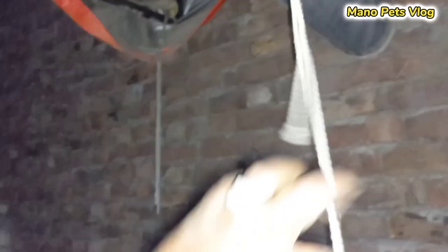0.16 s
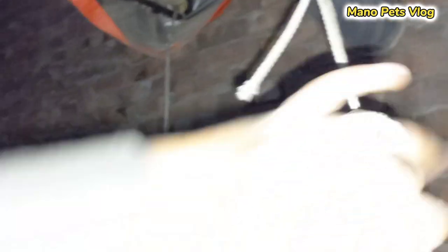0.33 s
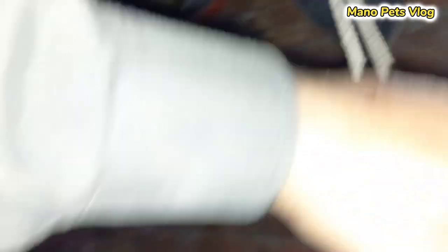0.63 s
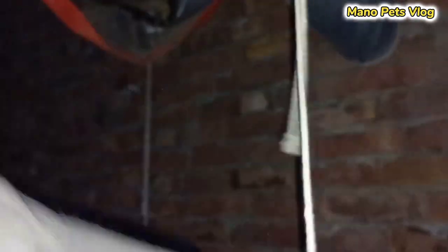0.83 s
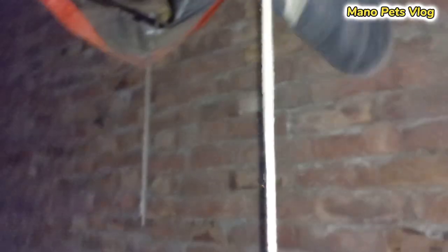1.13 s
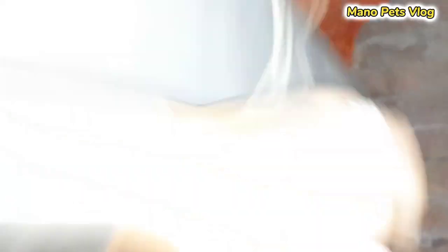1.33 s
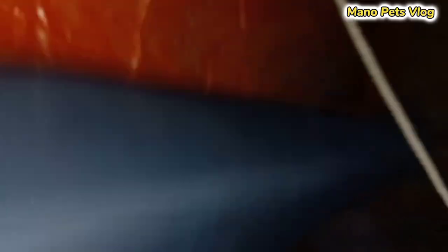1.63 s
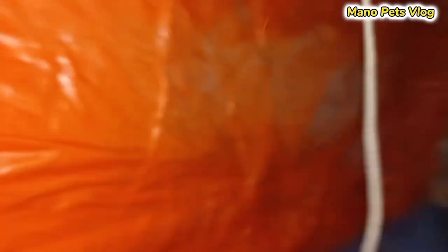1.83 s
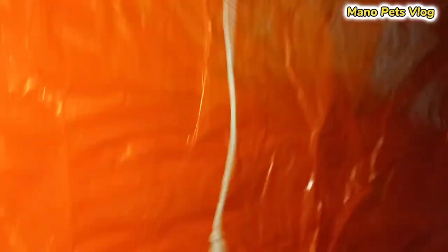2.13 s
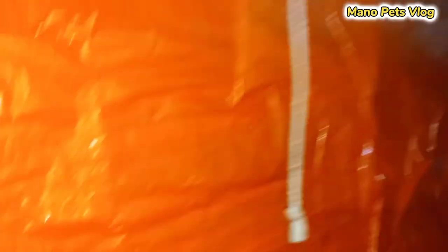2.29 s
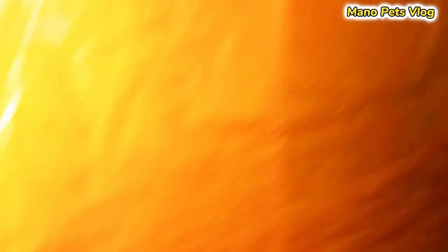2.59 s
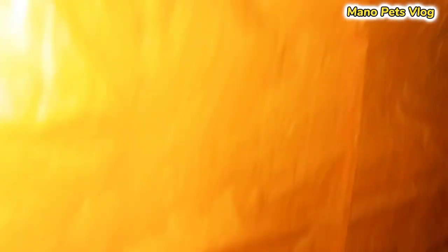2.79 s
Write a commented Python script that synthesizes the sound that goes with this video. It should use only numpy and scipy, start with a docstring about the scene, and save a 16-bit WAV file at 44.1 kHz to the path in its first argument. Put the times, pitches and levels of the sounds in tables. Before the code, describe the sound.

A plastic sheet curtain, very close: soft raspy rope tugs first, then a sharp slap as it drops, a loud rustling slide, hard knocks on the left, and uneven crinkling in a small brick shed.

```python
"""Brick farm shed: a plastic sheet curtain is untied and let down close to the microphones.
Rope tugs are dense clicks filtered to a rasp and a hollow rub. The sheet drops with a slap (crack and modes),
slides past (filtered noise) and knocks on the left microphone (damped rings), then unfolds with zips
(rough rising tones) and crinkles as it settles (clicks in three bands). Low thumps and hollow hums (wandering
sines), low buffeting, faint hiss and short wall echoes surround it."""
import sys
import numpy as np
from scipy import signal
from scipy.fft import rfft, irfft, next_fast_len
from scipy.io import wavfile

SR = 44100
rng = np.random.default_rng(int(sys.argv[2]) if len(sys.argv) > 2 else 0)


def store_pcm(level_fs):
    """Save levels as 16-bit WAV."""
    pcm = np.round(np.clip(level_fs, -1, 1) * 32767).astype(np.int16)
    wavfile.write(sys.argv[1], SR, np.atleast_2d(pcm).T)


N = 130095
T = np.arange(N) / SR

# Spectra list f/Hz, level/dB; only their shape counts. L-R/dB is left over right.
# air pushed onto the microphones: t/s, level/dB before trim
DRAUGHT = [(0, -31.5), (.22, -47.5), (.45, -42.5), (.65, -46.5), (.76, -35.5), (.85, -52), (1.048, -42),
           (1.056, -21.5), (1.115, -21.5), (1.135, -28), (1.3, -35.5), (1.38, -23), (1.5, -28), (1.55, -48),
           (1.75, -41), (1.9, -26.5), (2.12, -46), (2.39, -35), (2.47, -37), (2.57, -31), (2.7, -41.5),
           (2.76, -46.5), (2.95, -51)]
# spectrum of the buffeting: f/Hz, level/dB
DRAUGHT_SPECTRUM = [(22, -40), (45, -14), (85, -6), (120, -9), (170, -18), (260, -28.5)]
DRAUGHT_TRIM_DB = -1.5
# balance of buffeting and hollow body: t/s, L-R/dB
LOW_PAN = [(0, -0.5), (1.3, 0.5), (1.42, 7), (1.5, 10), (1.58, 15), (1.7, 4.5), (2.1, 1), (2.6, 1),
           (2.95, 1.5)]
# spectrum of the shed's hiss: f/Hz, level/dB
FLOOR_SPECTRUM = [(59, -55), (100, -29), (300, -15), (497, -12), (825, -37), (1760, -11.5), (3690, -18),
                  (6000, -19), (15500, -40.5)]
FLOOR_DB, FLOOR_PAN_DB = -44, -7

# rope tugs: t/s, rasp rise/ms, rasp decay/ms, rasp level/dB, hollow rub level/dB (before trims)
TUGS = [(-.01, 33, 67, -34.5, -39.5), (0.166, 2.6, 16, -32, -53), (.192, 3.5, 21, -36, -40),
        (0.256, 5.4, 36, -25, -32.5), (.266, 15.6, 44, -23, -30), (0.342, 5.8, 39, -27.5, -27),
        (0.353, 30.5, 28, -26.5, -27.5), (.435, 1.9, 69, -26.5, -30), (0.545, 16.4, 68, -30.5, -30),
        (.595, 24, 14.3, -27.5, -31), (0.699, 35, 83, -40, -40.5), (.722, 19.6, 9, -46, -26.5),
        (0.803, 34, 45, -36.5, -65)]
# spectrum of the rope's rasp: f/Hz, level/dB
RASP_SPECTRUM = [(470, -28), (800, -12), (1250, -3), (1550, -0.5), (1860, 1.5), (2730, 1), (3330, -2.5),
                 (4060, 1), (5400, -3.5), (7010, -5), (7840, -13.5), (15500, -16.5)]
# spectrum of the rope's hollow rub: f/Hz, level/dB
RUB_SPECTRUM = [(76, -83), (130, -35), (235, -10.5), (327, -10.5), (419, -6.5), (822, -20), (1000, -18),
                (1300, -22), (2200, -120)]
RASP_TRIM_DB, RASP_PAN_DB, RUB_TRIM_DB, RUB_PAN_DB = 2.5, -6.5, -1, 0.2
SHED_T60_S, ROPE_WET_DB, SHEET_WET_DB = 0.15, -14, -23.5  # T60 at low f

# low thumps and hollow housing hums: t/s, rise/ms, decay/ms, nominal f/Hz, level/dB, L-R/dB
HUMS = [(.004, 14, 15, 130, -26.5, -2.5), (.005, 4.8, 17.5, 267, -31.5, 1), (.492, 8.3, 16, 565, -30, 3),
        (0.717, 16, 10, 190, -22.5, 1), (1.052, 8, 13, 86, -12, 1), (1.098, 14, 8.5, 94, -12.5, 1.5),
        (1.099, 2.7, 11.7, 237, -18.5, 1), (1.326, 9.5, 17, 443, -19, 12), (1.469, 15.4, 7.6, 110, -12, 23),
        (1.471, 3.7, 15, 282, -16.5, 21), (1.89, 26, 12, 258, -28.5, 0), (2.345, 12, 14, 518, -27.5, 7),
        (2.534, 15, 18, 491, -27, 2.5), (2.542, 10, 22, 96.5, -24, 3), (2.72, 11.5, 10, 446, -27, 3.5),
        (2.806, 19, 28, 463, -24, 2), (2.832, 7.1, 10, 350, -23, -1), (2.826, 12, 21, 229, -30, -2),
        (2.908, 14, 25, 462, -31, .5)]
HUM_WANDER, HUM_WANDER_HZ = .05, 150  # rms of log pitch
# large folds collapse: t/s, rise/ms, decay/ms, level/dB, L-R/dB
FOLDS = [(0.271, 6.9, 31, -28.5, -8), (.365, 3.7, 35, -31, -11), (.44, 7, 73, -30, -5),
         (1.891, 2.6, 12, -17.5, -3), (1.906, 3.3, 11, -24, 8), (2.342, 10, 33, -32, -3),
         (2.538, 6, 16, -32, 0)]
# spectrum of a fold's dull crunch: f/Hz, level/dB
FOLD_SPECTRUM = [(130, -18), (260, 6.5), (520, 1.5), (900, -2), (1500, -8.5), (2800, 3), (3900, -6),
                 (5200, -32)]

# housing modes rung by the slap: f/Hz, level/dB, decay/ms
SLAP_MODES = [(572, -2, 2.1), (815, -22, 21), (1840, -17, 2), (3101, -38, 2.5), (4260, -18.5, 4),
              (5700, -19, 3), (7800, -16.5, 1.7)]
SLAP_S, SLAP_CRACK_DB, SLAP_CRACK_MS = 1.05, -12.5, 4
# spectrum of a slap's or knock's crack: f/Hz, level/dB
CRACK_SPECTRUM = [(150, 7.5), (900, 6), (2000, 8.5), (5000, -4), (9000, -7.5), (15000, -8)]

# falling sheet: t/s, crinkle/dB, top hiss/dB, hollow body/dB (before trims)
FALL = [(1.06, -32.5, -37.5, -25), (1.126, -37, -44.5, -36), (1.234, -29, -39.5, -27),
        (1.26, -33, -37.5, -34), (1.314, -22.5, -27.5, -24), (1.332, -20, -28.5, -19.5),
        (1.382, -27, -36.5, -27), (1.446, -27.5, -35.5, -30), (1.488, -21.5, -31, -19),
        (1.522, -63, -57, -44), (1.54, -53, -49, -80)]
# settling sheet: t/s, crinkle/dB, top hiss/dB, hollow body/dB (before trims)
SETTLE = [(1.55, -55, -54, -50), (1.6, -37, -44, -46.5), (1.642, -36.5, -43.5, -45.5),
          (1.686, -30, -34, -36.5), (1.81, -33, -39, -36), (1.862, -25.5, -36.5, -28.5),
          (1.886, -29.5, -38, -31.5), (1.908, -23.5, -33.5, -22), (1.935, -28.5, -36.5, -32),
          (1.986, -31, -42.5, -29), (2.028, -34, -37.5, -32), (2.05, -34, -46, -40),
          (2.085, -30.5, -44, -33.5), (2.14, -40, -46.5, -36), (2.18, -33, -45, -30.5),
          (2.266, -34.5, -46.5, -34), (2.356, -30.5, -37.5, -28), (2.458, -33, -41, -32),
          (2.492, -29, -37, -29), (2.708, -34.5, -46, -33.5), (2.746, -38.5, -46.5, -34.5),
          (2.8, -64, -57, -50), (2.812, -33.5, -59, -41), (2.84, -36, -50, -33.5), (2.902, -49, -66, -43.5),
          (2.918, -38, -54, -39), (2.95, -48, -62, -39)]
# spectrum of the crinkle: f/Hz, level/dB
CRINKLE_SPECTRUM = [(530, -30), (900, -11.5), (1600, -3), (1690, 1), (2280, 3.5), (3220, 0.5), (3520, 1.5),
                    (7000, -3), (7800, -15.5), (10100, -32), (17200, -120)]
# spectrum of the top hiss: f/Hz, level/dB
HISS_SPECTRUM = [(4290, -35), (7300, -2.5), (8380, -5.5), (11900, 0), (15100, -4.5), (15700, -5.5)]
# spectrum of the hollow body: f/Hz, level/dB
BODY_SPECTRUM = [(94, -14), (160, -0.5), (290, 2), (453, 3.5), (552, 3.5), (604, -0.5), (768, -0.5),
                 (1150, -6), (1500, -7), (2530, -120)]
CRINKLE_TRIM_DB, HISS_TRIM_DB, BODY_TRIM_DB = 1.38, 2, 0.4
CRINKLE_PAN_DB, HISS_PAN_DB = -4.5, -0.5
PATCH_RMS_DB, PATCH_HZ = 2.0, 20

# sheet scrapes past the housing, one event: t/s, rise/ms, decay/ms, level/dB
SLIDE = (1.3, 55, 106, -27)
# spectrum of its narrow, nasal rasp: f/Hz, level/dB
SLIDE_SPECTRUM = [(1650, -12), (2150, 3), (2650, -12)]
# single creases snap: t/s, level/dB before trim, L-R/dB
CREASES = [(1.334, -4.5, 14), (1.842, -9.5, 0), (1.864, -10.5, 18), (1.894, -8, -6), (1.905, -16, 16),
           (1.913, -13, 3), (2.015, -19, -6), (2.0243, -12.5, 3), (2.073, -19, 1), (2.234, -19, -1),
           (2.302, -19, -8), (2.3262, -11.5, -2.5), (2.347, -12, 3), (2.4735, -22, -10), (2.701, -18, -9)]
# spectrum of a snap: f/Hz, level/dB
CREASE_SPECTRUM = [(300, -19), (1200, -1), (2500, 5.5), (6800, 1), (8000, -4.5), (12000, -7), (16000, -5)]
CREASE_DECAY_MS, CREASE_TRIM_DB = 2.8, -5

# sheet strikes the left microphone: t/s, ring level/dB, L-R/dB, ring f/Hz, ring decay/ms, crack level/dB
KNOCKS = [(1.49, -10, 27, 1390, 1.9, -11), (1.5049, -9, 31, 1860, 0.55, -9.5),
          (1.5166, -2.5, 31, 1000, 0.61, -15.5)]
CRACK_DECAY_RATIO = 2  # to the ring's decay
# rising zips as the sheet moves near the microphones: t/s, length/s, from f/Hz, to f/Hz, level/dB
ZIPS = [(1.57, .052, 620, 1580, -41.5), (1.576, .036, 1650, 2250, -41), (1.668, .03, 2050, 2700, -30),
        (1.665, .062, 2900, 4950, -28.5), (1.706, .046, 4500, 5300, -36)]
ZIP_ROUGH, ZIP_OCTAVE_DB = .06, -14  # rms of relative f; second harmonic
CUTOFF_HZ = 15850


def from_db(db):
    """Decibels to gain."""
    return 10 ** (np.asarray(db) / 20)


def rms_one(x):
    """Scale to unit power."""
    return x / np.sqrt(np.mean(np.abs(x) ** 2) + 1e-20)


def in_time(rows):
    """Each column of a table as a curve in time."""
    s, *columns = np.transpose(rows)
    return [np.interp(T, s, c) for c in columns]


def pan(db):
    """Left and right gains with a mean of one."""
    gains = from_db(np.array([[1], [-1]]) * db / 2)
    return gains / gains.mean(0)


def colour(x, spectrum):
    """Minimum-phase filter of unit power gain, falling steeply beyond the ends of the spectrum."""
    size = next_fast_len(N + SR // 2, True) // 2 * 2
    octave = np.log2(np.fft.rfftfreq(size, 1 / SR) + 1)
    hz, db = np.transpose(spectrum)
    knots = np.log2(hz)
    octaves_outside = np.abs(octave - np.clip(octave, knots[0], knots[-1]))
    gain_db = np.interp(octave, knots, db) - np.minimum(60 * octaves_outside, 70)
    cepstrum = irfft(np.log(rms_one(from_db(gain_db))))
    # fold onto positive time: causal
    cepstrum[1:size // 2] *= 2
    cepstrum[size // 2 + 1:] = 0
    return irfft(rfft(x, size) * np.exp(rfft(cepstrum)))[..., :N]


def drift(rate_hz):
    """Noise through two equal low-pass poles at rate_hz, unit rms."""
    r = np.exp(-2 * np.pi * rate_hz / SR)
    noise = rng.standard_normal(N + SR)
    return rms_one(signal.lfilter([1], [1, -2 * r, r * r], noise)[SR:])


def swell(start_s, rise_ms, decay_ms):
    """Straight rise, then an exponential decay with the given time constant."""
    ms = (T - start_s) * 1000
    rise = np.clip(ms / abs(rise_ms), 0, 1)
    return rise * np.exp(-np.clip((ms - rise_ms) / abs(decay_ms), 0, 30))


def slips(per_s, spread_db, scatter_ms, lag_ms, clump_db):
    """Tiny buckles: random clicks of uneven size, each with its own delay from left to right."""
    size = from_db(spread_db * np.minimum(rng.exponential(1, N), 4))
    size = size * rng.choice([-1, 1], N)
    left = size * (rng.random(N) < per_s / SR) * from_db(clump_db * drift(48))
    delay = (lag_ms + scatter_ms * rng.standard_normal(N)) * SR / 1000  # samples
    right_at = (np.arange(N) + np.round(delay).astype(int)) % N
    return np.array([left, np.bincount(right_at, left, N)])


def voiced(clicks, spectrum, gain):
    """Clicks under a level curve ring through a spectrum; the curve sets the level of the middle."""
    return colour(clicks * gain, spectrum) / np.std(colour(clicks.mean(0), spectrum))


def air():
    """Low buffeting from the moving sheet, over the shed's faint hiss."""
    gusts = slips(per_s=2500, spread_db=1.2, scatter_ms=.7, lag_ms=.2, clump_db=1.5)
    level = from_db(in_time(DRAUGHT)[0] + DRAUGHT_TRIM_DB)
    draught = voiced(gusts, DRAUGHT_SPECTRUM, level) * pan(in_time(LOW_PAN)[0])
    floor = colour(rng.standard_normal((2, N)), FLOOR_SPECTRUM)
    return draught + from_db(FLOOR_DB) * pan(FLOOR_PAN_DB) * floor


def rope():
    """Each tug drags the rope over the plastic: a dense rasp on the right and a slower hollow rub."""
    rasp_power = sum((from_db(db) * swell(s, rise, decay)) ** 2 for s, rise, decay, db, _ in TUGS)
    rub_power = sum((from_db(db) * swell(s, rise + 6, decay * 1.56)) ** 2
                    for s, rise, decay, _, db in TUGS)
    rasp_slips = slips(per_s=8000, spread_db=2.0, scatter_ms=.35, lag_ms=-.12, clump_db=0.5)
    rub_slips = slips(per_s=3200, spread_db=1.0, scatter_ms=0.2, lag_ms=-0.028, clump_db=0.1)
    rasp = voiced(rasp_slips, RASP_SPECTRUM, np.sqrt(rasp_power))
    rub = voiced(rub_slips, RUB_SPECTRUM, np.sqrt(rub_power))
    return from_db(RASP_TRIM_DB) * pan(RASP_PAN_DB) * rasp + from_db(RUB_TRIM_DB) * pan(RUB_PAN_DB) * rub


def shed(x):
    """Brick walls: eight dull feedback delays a side."""
    size = next_fast_len(N + SR)
    hz = np.fft.rfftfreq(size, 1 / SR)
    walls = np.zeros((2, len(hz)), complex)
    for k, lag_s in enumerate(np.geomspace(.007, .043, 16)):
        loss = from_db(-60 * lag_s / SHED_T60_S) / (1 + (hz / 14000) ** 2)
        echo = loss * np.exp(-2j * np.pi * hz * lag_s)
        walls[k % 2] += (-1) ** (k // 2) * echo / (1 - echo)
    return irfft(rfft(x, size) * rms_one(walls), size)[:, :N]


def hums():
    """A short low thump or hollow hum of the microphone housing, its pitch wandering slightly."""
    out = 0
    wander = np.exp(HUM_WANDER * drift(HUM_WANDER_HZ))
    for s, rise, decay, hz, db, pan_db in HUMS:
        phase = 2 * np.pi * np.cumsum(hz * wander * (T > s)) / SR
        level = np.sqrt(2) * from_db(db) * pan(pan_db) * swell(s, rise, decay)
        out = out + level * np.sin(phase)
    return out


def folds():
    """A large fold collapses in a short run of coarse buckles."""
    level = sum(from_db(db) * pan(pan_db) * swell(s, rise, decay) for s, rise, decay, db, pan_db in FOLDS)
    buckles = slips(per_s=4000, spread_db=2.5, scatter_ms=0.22, lag_ms=0.058, clump_db=.5)
    return voiced(buckles, FOLD_SPECTRUM, level)


def slap():
    """The falling sheet lands flat on the microphone housing: a crack and a few short modes."""
    ring = sum(from_db(db) * swell(SLAP_S, 0.096, decay) * np.sin(2 * np.pi * hz * (T - SLAP_S))
               for hz, db, decay in SLAP_MODES)
    crack = from_db(SLAP_CRACK_DB) * swell(SLAP_S, 0.25, SLAP_CRACK_MS)
    return ring + colour(crack * rng.standard_normal((2, N)), CRACK_SPECTRUM)


def shifting(x):
    """As the folds change shape, each band of the rustle swells and fades on its own."""
    octave = np.log2(np.fft.rfftfreq(N, 1 / SR) + 1)
    centres = np.log2(np.geomspace(700, 8000, 8))
    spectrum, out = rfft(x), 0
    for share in np.eye(len(centres)):
        band = irfft(spectrum * np.sqrt(np.interp(octave, centres, share)), N)
        out = out + band * rms_one(from_db(PATCH_RMS_DB * drift(PATCH_HZ)))
    return out * np.std(x) / np.std(out)


def sheet():
    """The moving sheet buckles thousands of times a second: crinkle, top hiss, larger folds' hollow body."""
    crinkle_db, hiss_db, body_db = in_time(list(FALL) + list(SETTLE))
    loose = T > SLAP_S
    crinkle_slips = slips(per_s=9000, spread_db=3.5, scatter_ms=.32, lag_ms=.22, clump_db=0.74)
    hiss_slips = slips(per_s=18000, spread_db=3.0, scatter_ms=0.25, lag_ms=0.17, clump_db=1.0)
    body_slips = slips(per_s=4000, spread_db=1.5, scatter_ms=.2, lag_ms=.15, clump_db=1.2)
    crinkle = voiced(crinkle_slips, CRINKLE_SPECTRUM, loose * from_db(crinkle_db + CRINKLE_TRIM_DB))
    hiss = voiced(hiss_slips, HISS_SPECTRUM, loose * from_db(hiss_db + HISS_TRIM_DB))
    body = voiced(body_slips, BODY_SPECTRUM, loose * from_db(body_db + BODY_TRIM_DB))
    rustle = pan(CRINKLE_PAN_DB) * shifting(crinkle) + pan(HISS_PAN_DB) * hiss
    return rustle + pan(in_time(LOW_PAN)[0]) * body


def slide():
    """The falling sheet scrapes past the housing: noise in a narrow band."""
    s, rise, decay, db = SLIDE
    return from_db(db) * swell(s, rise, decay) * colour(rng.standard_normal((2, N)), SLIDE_SPECTRUM)


def creases():
    """A large crease gives way in a few milliseconds: a burst of filtered noise."""
    level = sum(from_db(db + CREASE_TRIM_DB) * pan(pan_db) * swell(s, 0.41, CREASE_DECAY_MS)
                for s, db, pan_db in CREASES)
    return colour(level * rng.standard_normal((2, N)), CREASE_SPECTRUM)


def knocks():
    """The sheet hits the microphone housing: a heavily damped ring and a crack."""
    ring, crack = 0, 0
    for s, ring_db, pan_db, hz, decay, crack_db in KNOCKS:
        tone = swell(s, 0.088, decay) * np.sin(2 * np.pi * hz * (T - s))
        ring = ring + from_db(ring_db) * pan(pan_db) * tone
        crack = crack + from_db(crack_db) * pan(pan_db) * swell(s, 0.13, CRACK_DECAY_RATIO * decay)
    return ring + colour(crack * rng.standard_normal((2, N)), CRACK_SPECTRUM)


def zips():
    """A rough tone rises and levels off as the sheet and its reflection shift."""
    out = 0
    for s, length, from_hz, to_hz, db in ZIPS:
        along = np.clip((T - s) / length, 0, 1)
        hz = from_hz + (to_hz - from_hz) * np.sin(np.pi / 2 * along)
        rough = 1 + ZIP_ROUGH * np.array([drift(530), drift(605)])  # left, right
        phase = 2 * np.pi * np.cumsum(hz * (T > s) * rough, axis=1) / SR
        tone = np.sin(phase) + from_db(ZIP_OCTAVE_DB) * np.sin(2 * phase)
        out = out + 2 * from_db(db) * np.sin(np.pi * along) * tone
    return out * pan(CRINKLE_PAN_DB)


def scene():
    """Rope and sheet in the shed, with hums, slap, knocks and draught dry at the microphones."""
    tugs = rope()
    plastic = sheet() + creases() + folds() + zips() + slide()
    room = shed(from_db(ROPE_WET_DB) * tugs + from_db(SHEET_WET_DB) * plastic)
    return tugs + plastic + room + hums() + slap() + knocks() + air()


def record(dry):
    """Peaks beyond full scale clip; a steep low-pass cuts the top."""
    low_pass = signal.ellip(12, .1, 80, CUTOFF_HZ, fs=SR, output="sos")
    return signal.sosfilt(low_pass, np.clip(dry, -1, 1))


dry = scene()
out = record(dry)
store_pcm(out)
```